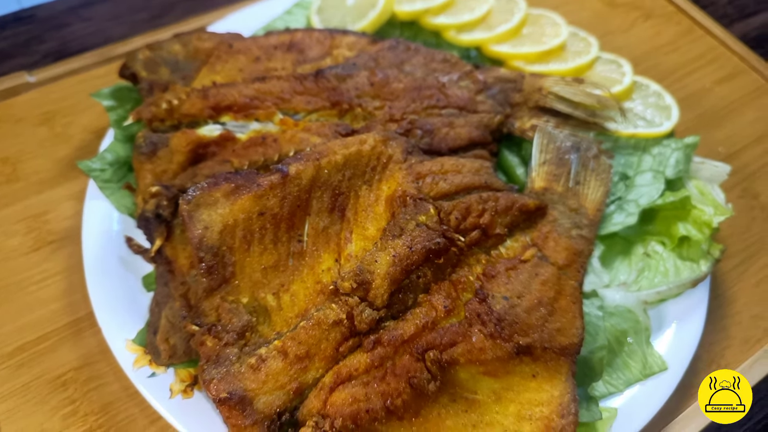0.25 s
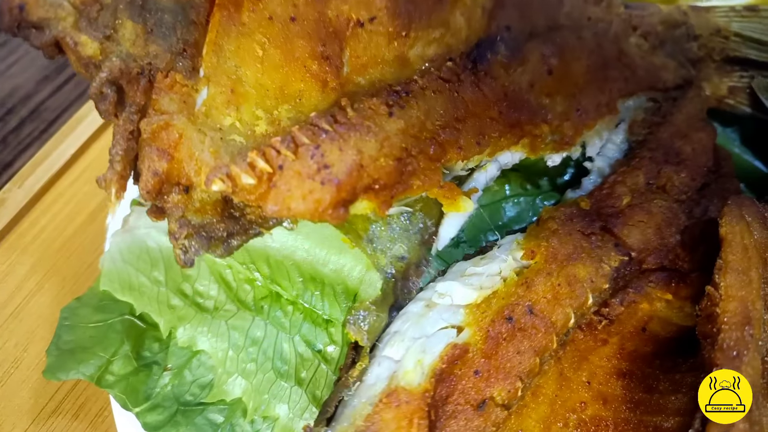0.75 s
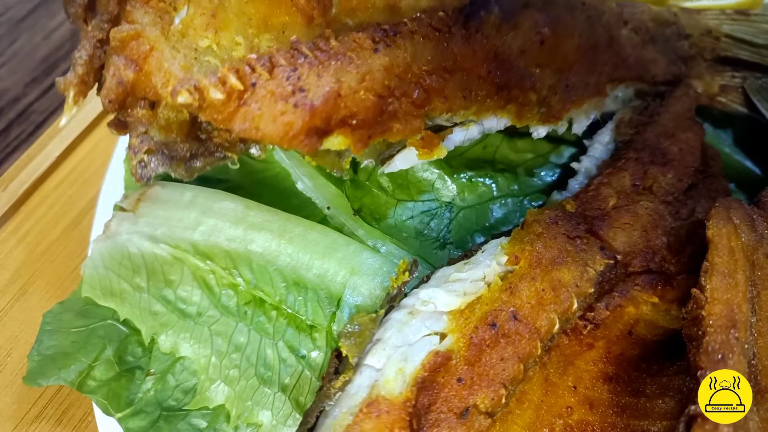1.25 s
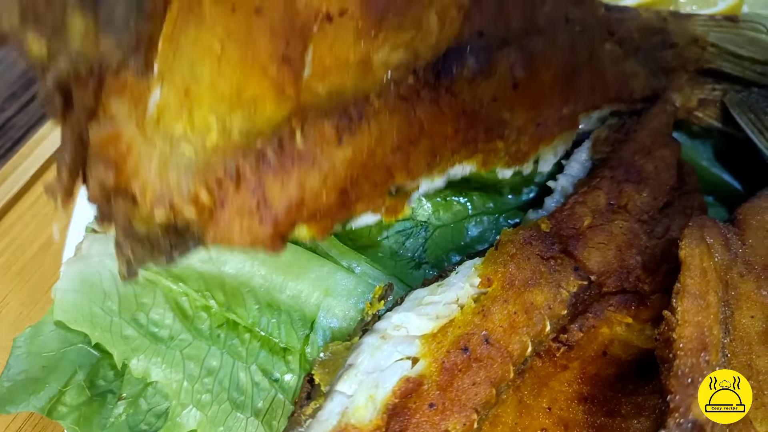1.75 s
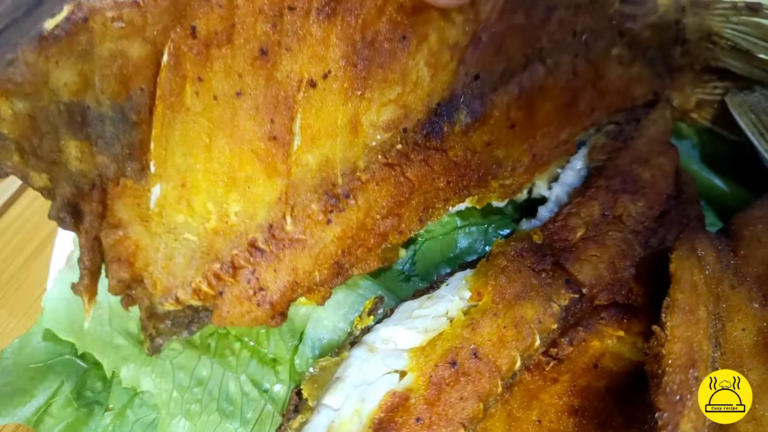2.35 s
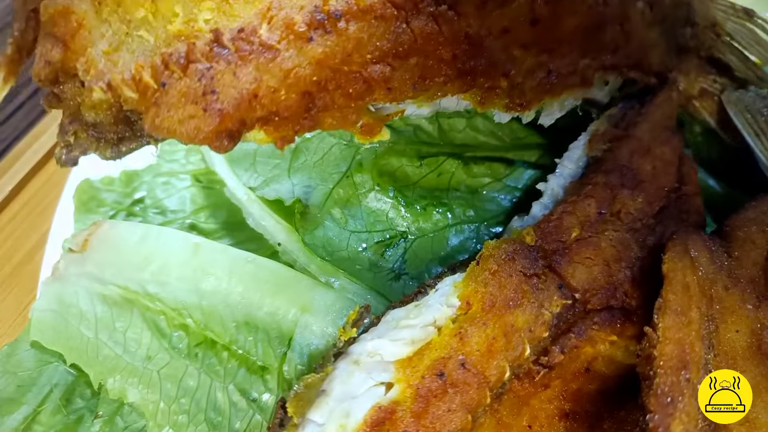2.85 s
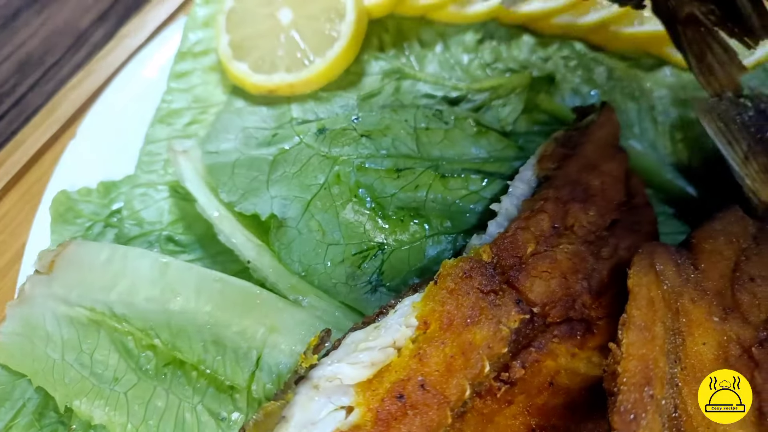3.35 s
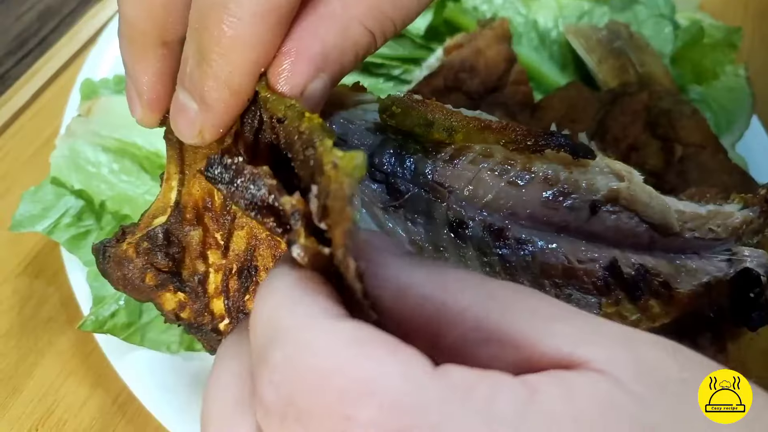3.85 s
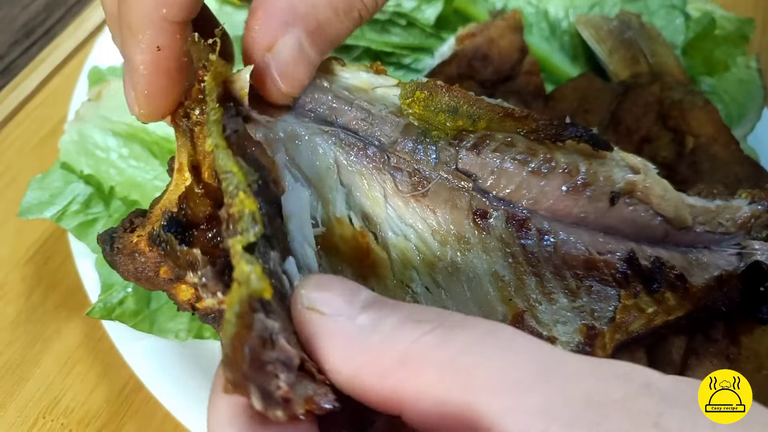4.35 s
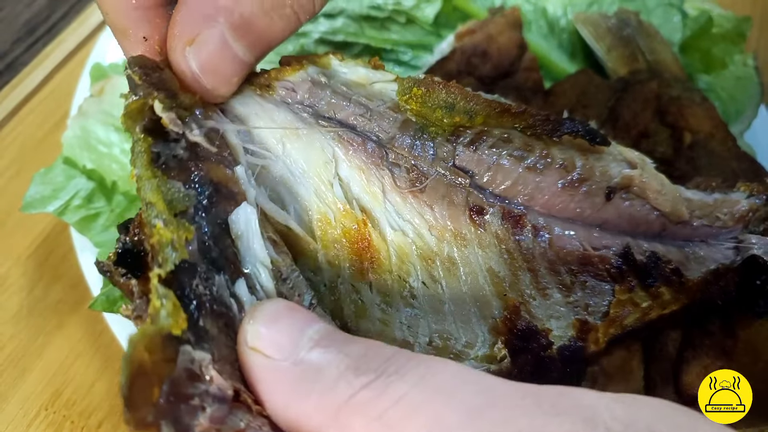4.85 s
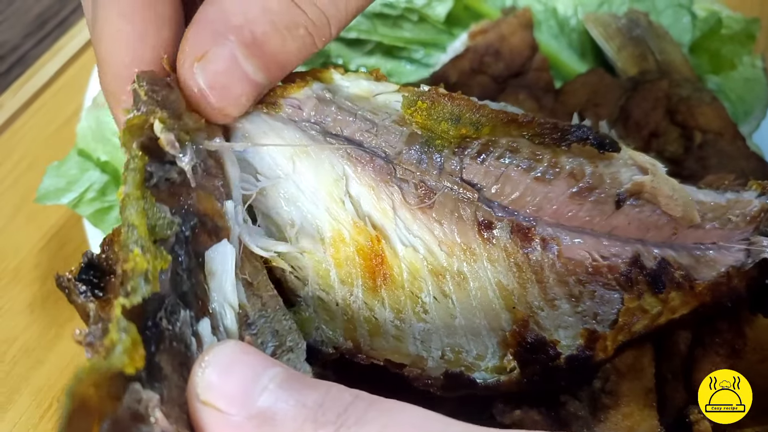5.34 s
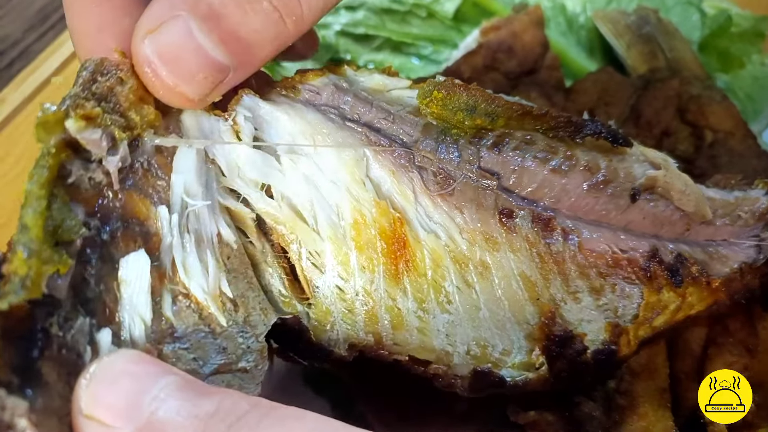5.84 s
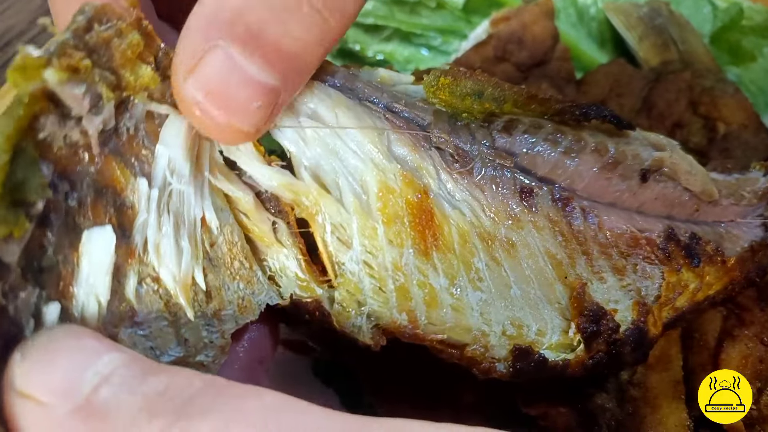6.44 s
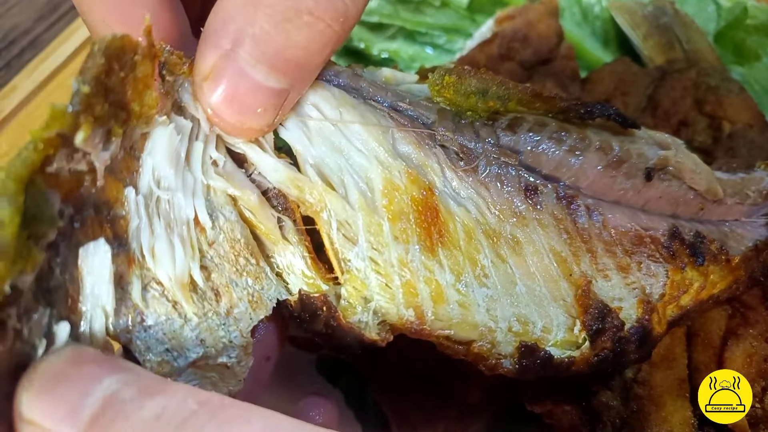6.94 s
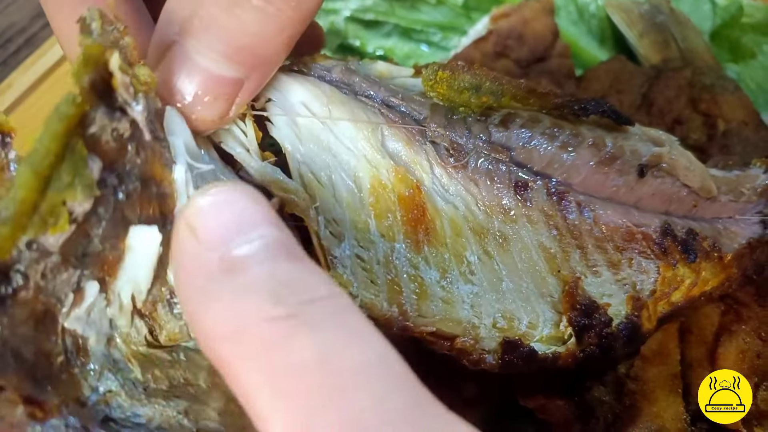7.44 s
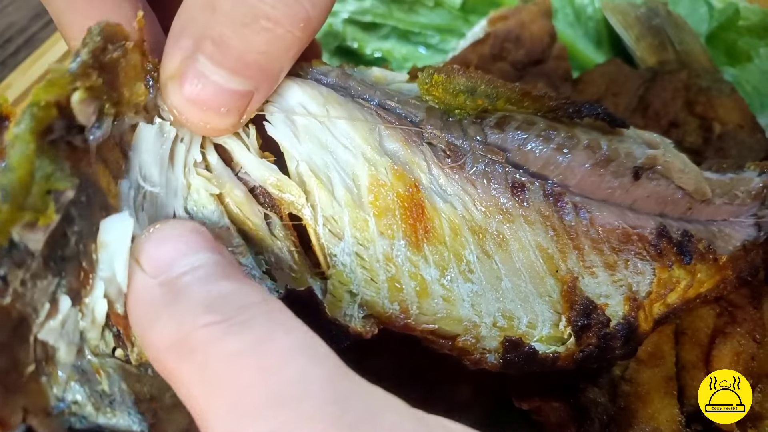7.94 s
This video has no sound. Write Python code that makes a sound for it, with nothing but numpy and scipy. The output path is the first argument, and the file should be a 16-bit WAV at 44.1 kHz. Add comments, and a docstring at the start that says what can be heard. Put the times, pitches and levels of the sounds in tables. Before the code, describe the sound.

A quiet kitchen hums with low fan rumble and a briefly stronger motor drone. Then hands lift a crisp fried fish: sharp dry snaps, ticks and fizzing crackle, soft dragging over lettuce and small dull plate knocks. After a burst near the middle, the fish is opened and its flesh tears with moist, fibrous crackles. Very close stereo microphones, small dry room.

```python
"""Pulling apart a crisp fried fish

Hands pull a fried fish apart on a bed of lettuce. Crust fractures are noise cracks through short random
resonances; streams of smaller grains make the crackle, the dragging skin and the tearing flesh.
A plate rings in damped modes, and filtered noise makes soft brushes of skin. Behind it lie a beating hum
of sines, fan noise, a wavering motor drone, an electrical whine and a gliding whistle."""
import sys
import numpy as np
from scipy import signal
from scipy.fft import rfft, irfft
from scipy.io import wavfile
from scipy.ndimage import uniform_filter1d

SR = 44100
rng = np.random.default_rng(int(sys.argv[2]) if len(sys.argv) > 2 else 0)


def wav_record(signal):
    """Record a signal, one row per channel, as 16-bit PCM in the file named by sys.argv[1]."""
    frames = np.transpose(np.atleast_2d(signal))
    bounded = np.clip(frames, -1, 1)
    # unit amplitude maps onto the largest positive 16-bit level
    quanta = np.round(bounded * 32767).astype(np.int16)
    wavfile.write(sys.argv[1], SR, quanta)


N = 361179
TIME = np.arange(N) / SR
SPECTRUM_HZ = np.fft.rfftfreq(N, 1 / SR)
RING_HZ = np.fft.rfftfreq(1024, 1 / SR)
OPENED_S = 3.7  # the fish lies open from here


def gain_of(db):
    """Decibel law: level in dB to amplitude."""
    return 10 ** (np.asarray(db) / 20)


def evened(x):
    """Normalisation: scales to rms 1."""
    return x / np.sqrt(np.mean(x ** 2) + 1e-20)


def follow(track):
    """Linear interpolation of a (time, value) table over the scene."""
    return np.interp(TIME, *np.transpose(track))


def read(points, hz, channels=1):
    """Spectral envelope: interpolates one table column on a log-frequency axis."""
    table = np.transpose(points)
    return np.interp(np.log(hz + 1), np.log(table[0] + 1), table[channels])


def add(mix, s, sound):
    """Superposition: mixes a stereo sound in at time s."""
    part = mix[:, max(round(s * SR), 0):][:, :sound.shape[1]]
    part += sound[:, :part.shape[1]]


def wander(hz):
    """Low-passed random fluctuation of rms 1, with rates up to about hz."""
    return evened(irfft(rfft(rng.standard_normal(N)) * np.exp(-(SPECTRUM_HZ / hz) ** 2), N))


def causal(db):
    """Minimum phase: the shortest ring with this spectrum, by folding its cepstrum."""
    cepstrum = irfft(np.log(gain_of(db)))
    half = cepstrum.shape[-1] // 2
    fold = np.r_[1, np.full(half - 1, 2), 1, np.zeros(half - 1)]
    return irfft(np.exp(rfft(cepstrum * fold)))


def panned(pan_db):
    """Constant-power panning: left and right gains, pan_db apart."""
    gains = gain_of(np.array([[1], [-1]]) * pan_db / 2)
    return gains / np.sqrt((gains ** 2).mean(0))


# left-right likeness of the air: (f/Hz, coherence)
AIR_COHERENCE = [(30, 0), (100, 0.66), (250, 0.95), (500, 0.03), (1000, 0.0015), (3000, 0), (16000, 0)]


def air(spectrum):
    """Partial coherence: coloured stereo noise of rms 1, its sides most alike near 250 Hz."""
    a, b = rfft(rng.standard_normal((2, N)))
    same = np.clip(read(AIR_COHERENCE, SPECTRUM_HZ), -1, 1)
    right = same * a + np.sqrt(1 - same ** 2) * b
    return evened(irfft(np.array([a, right]) * gain_of(read(spectrum, SPECTRUM_HZ)), N))


# colour of the fan rumble: (f/Hz, level/dB)
FAN_SPECTRUM = [(20, -37), (50, -33), (80, -23), (120, -15.5), (160, -7.5), (205, -4.5), (245, -3.5),
                (285, -3), (340, -8.5), (430, -9.5), (480, -15), (570, -14), (640, -19.5), (740, -27.5),
                (1200, -45)]
# course of the fan before its overall gain: (t/s, level/dB)
FAN_TRACK = [(0, -51), (.34, -51), (.36, -46.5), (1.3, -47.5), (1.8, -49.5), (3.3, -49.5), (3.9, -52),
             (6.3, -52.5), (8.19, -52.5)]
# colour of the faint hiss: (f/Hz, level/dB)
HISS_SPECTRUM = [(100, 0), (800, 0), (1400, -3), (2100, -2.5), (3400, -3), (4400, -7), (5200, -3),
                 (6700, -1), (8400, -3), (8750, -14), (12000, -13.5), (16000, -15)]
# colour of the noise in the drone: (f/Hz, level/dB)
DRONE_SPECTRUM = [(150, -47), (300, -22), (345, -7), (392, -7), (415, -7), (470, -22), (560, -20),
                  (700, -33), (890, -36), (1200, -45), (2800, -44), (4200, -51.5), (6500, -37),
                  (12000, -57)]
# tones of the droning motor: (f/Hz, level/dB relative to the drone)
DRONE_PARTIALS = [(361, -9.5), (393, -8), (538.5, -21.5), (748, -35), (840, -38), (883, -32.5)]
# the drone is strong for a moment, then sinks under the fan: (t/s, level/dB)
DRONE_TRACK = [(0, -45), (.34, -43.5), (.355, -57), (3.7, -61), (3.85, -72), (8.19, -76)]


def kitchen(fan_db=-3.5):
    """Broadband and tonal noise: fan rumble, faint hiss and a motor droning on wavering tones."""
    hiss_db, drone_noise_db, waver_rad = -66.4, -4.5, 0.55
    fan = air(FAN_SPECTRUM) * gain_of(follow(FAN_TRACK) + fan_db)
    tones = sum(gain_of(db) * np.cos(2 * np.pi * hz * TIME + waver_rad * wander(15))
                for hz, db in DRONE_PARTIALS)
    drone = gain_of(drone_noise_db) * air(DRONE_SPECTRUM) + np.sqrt(2) * tones
    return fan + gain_of(hiss_db) * air(HISS_SPECTRUM) + drone * gain_of(follow(DRONE_TRACK))


# motor tones of the kitchen: (f/Hz, level/dB before 3.7 s, level/dB after)
MOTOR_TONES = [(139, -76, -75), (150.4, -76, -73), (175.5, -79, -80), (198.2, -64.5, -69),
               (217.6, -72, -85), (228, -58.5, -79), (240, -66, -60.5), (247.2, -62, -63),
               (255.3, -73, -64), (276, -68.5, -74), (302, -68, -83), (439.5, -64, -74), (495, -87, -80),
               (540.6, -69.5, -74.5), (600, -71, -73)]


def hum(mains_db=-59.0, motor_db=-70.5, waver_rad=0.49):
    """Beating: mains hum against a motor slipping a little behind it; other motor tones waver."""
    mains_hz, slip_hz, in_step_s = 100.0, 1.443, 0.85
    t = TIME - in_step_s
    mains = gain_of(mains_db) * np.cos(2 * np.pi * mains_hz * t)
    motor = gain_of(motor_db) * np.cos(2 * np.pi * (mains_hz - slip_hz) * t)
    later = np.clip((TIME - OPENED_S) / 0.23, 0, 1)
    drifts = [waver_rad * wander(2.6) for _ in range(3)]  # tones share three phase drifts
    tones = np.zeros(N)
    for k, (hz, lifted_db, open_db) in enumerate(MOTOR_TONES):
        level_db = lifted_db + (open_db - lifted_db) * later
        phase = 2 * np.pi * (hz * TIME + rng.random()) + drifts[k % len(drifts)]
        tones += gain_of(level_db) * np.cos(phase)
    edge_fade = signal.windows.tukey(N, 0.002)
    return np.sqrt(2) * (mains + motor + tones) * gain_of([[0.4], [-0.4]]) * edge_fade


# a faint whine that fades early on: (t/s, rms level/dB)
WHINE_TRACK = [(0, -81), (.5, -79.5), (1.9, -86), (2.6, -100)]


def whine(whine_hz=5109):
    """Phase-modulated sine: a thin electrical tone."""
    tone = np.sin(2 * np.pi * whine_hz * TIME + 0.5 * wander(28))
    return np.sqrt(2) * gain_of(follow(WHINE_TRACK)) * tone


# each pull or shove builds up and lets go:
# (peak t/s, build-up t/s, release t/s, crust crackle level/dB, flesh rub level/dB)
HAND_PULLS = [(1.54, 0.018, 0.035, -57, -55.5), (1.84, 0.053, 0.027, -48, -53),
              (1.89, 0.049, 0.035, -47, -46), (2.11, 0.21, .04, -66, -64), (2.46, 0.048, 0.013, -58, -58.5),
              (2.69, 0.1, 0.061, -59, -60.5), (3.06, 0.097, 0.031, -48, -52.5),
              (3.165, 0.013, 0.02, -39.5, -48), (3.305, 0.038, 0.028, -44, -46.5),
              (3.355, 0.058, 0.02, -38.5, -43.5), (3.41, 0.033, 0.089, -53, -50),
              (3.5, 0.063, 0.011, -52, -64), (3.89, 0.035, 0.05, -43.5, -49),
              (4.025, 0.024, 0.048, -46.5, -47), (4.255, 0.017, 0.027, -51, -51.5),
              (4.38, 0.013, 0.018, -47.5, -57), (4.49, 0.034, 0.027, -52.5, -54),
              (4.58, 0.015, 0.017, -55, -55), (4.8, 0.031, 0.062, -46.5, -60),
              (4.925, 0.032, 0.018, -44, -52.5), (5.015, 0.061, 0.02, -54, -51.5),
              (5.068, 0.027, 0.051, -50.5, -52), (5.153, 0.039, 0.047, -44.5, -47),
              (5.44, 0.16, 0.16, -55, -76), (5.62, 0.12, 0.06, -49, -56.5), (5.966, .05, 0.046, -41, -44.5),
              (6.7, 0.028, 0.061, -57, -77), (7.06, 0.024, 0.078, -55, -68), (7.3, 0.07, 0.034, -51, -66),
              (7.362, 0.019, 0.029, -48, -51.5), (7.725, 0.036, 0.038, -42, -60.5),
              (7.783, 0.027, 0.016, -44, -64)]
# between pulls the hands keep a light hold: (t/s, crust crackle level/dB, flesh rub level/dB)
LIGHT_HOLD = [(0, -68, -81), (.65, -77.5, -71), (.85, -67, -68.5), (1.3, -69, -70.5), (1.7, -77, -67.5),
              (2.3, -78, -65), (2.95, -62, -68.5), (3.7, -77, -73), (4.15, -58, -57), (4.7, -68, -62.5),
              (5.3, -83, -66), (5.798, -61, -67.5), (6.15, -73, -69), (6.45, -63.5, -65.5), (6.6, -70, -68),
              (6.88, -60, -68), (7.17, -64, -73.5), (7.55, -69.5, -68), (8.19, -55, -76)]


def effort():
    """Power addition: pulls swell out of the light hold; returns crackle and rub levels in dB."""
    pull_shape = 1.13  # 1 = pointed peak, 2 = rounded
    s, *hold = np.transpose(LIGHT_HOLD)
    power = gain_of([np.interp(TIME, s, db) for db in hold]) ** 2
    for peak_s, build_s, release_s, crackle_db, rub_db in HAND_PULLS:
        t = np.arange(-4 * build_s, 4 * release_s, 1 / SR)
        swell = np.exp(-np.maximum(-t / build_s, t / release_s) ** pull_shape)
        add(power, peak_s + t[0], (gain_of([[crackle_db], [rub_db]]) * swell) ** 2)
    return 10 * np.log10(power)


# a typical fracture at the left and right port: (f/Hz, left level/dB, right level/dB)
CRUST_SPECTRUM = [(60, -75, -41), (251, -49, -25), (654, -29, -23), (1100, -16, -13), (1530, -23.5, -14),
                  (2880, -11.5, -10), (3070, -9.5, -3.5), (4500, -8, -14), (5720, -2.5, -10),
                  (6800, 3, -0.5), (7350, 0, 1), (8510, -12.5, 1), (8510, -20, -4.5), (14800, -19.5, -18.5)]


def crust_colour():
    """Spectral envelope of a fracture at both ports, in dB."""
    return np.array([read(CRUST_SPECTRUM, RING_HZ, channels=side) for side in (1, 2)])


def flake(colour_db, ripple_db, run_s, click_db, tail_db=-21):
    """Source and filter: a noise crack rings a flake's chance resonances, to energy 1 a side."""
    ripples = evened(uniform_filter1d(rng.standard_normal((3, len(RING_HZ))), size=20, axis=1))
    # one ripple pattern is shared by the ports, one is each port's own
    ring = causal(colour_db + ripple_db * (ripples[0] + 0.88 * ripples[1:]))
    t = np.arange(ring.shape[1]) / SR
    run_out = np.exp(-t / run_s) + gain_of(tail_db) * np.exp(-t / 0.005)
    crack = rng.standard_normal(ring.shape) * (1 - np.exp(-t / 0.00031)) * run_out
    crack /= np.linalg.norm(crack, axis=1, keepdims=True)
    # the sharp release reaches the two ports a few samples apart
    lag = int(np.clip(rng.normal(5, 7), -9, 24))
    crack[0, 10] += gain_of(click_db)
    crack[1, 10 + lag] += gain_of(click_db)
    sound = signal.fftconvolve(ring, crack, axes=1)[:, :len(t)]
    return sound / np.sqrt((sound ** 2).sum(1, keepdims=True))


def grains(colour_db, per_s, spread_db, ripple_db, tail_db=-11.0, count=30):
    """Random point process: tiny breaks of unequal size from many flakes, scaled to rms 1."""
    out = np.zeros((2, N))
    most_per_s = 3000
    for _ in range(count):
        sound = flake(colour_db, ripple_db, run_s=0.00035, click_db=-4.0, tail_db=tail_db)
        sound = sound * gain_of(rng.normal(0, 5.1) * np.array([[1], [-1]]))  # each flake has its side
        size, chance, when = rng.random((3, int(np.ceil(most_per_s * N / SR / count))))
        keep = chance < per_s / most_per_s
        start = (when[keep] * (N - sound.shape[1])).astype(int)
        at = start[:, None] + np.arange(sound.shape[1])
        # exponentially distributed level, cut off at three spreads
        size = gain_of(spread_db * np.minimum(-np.log(1 - size[keep]), 3))[:, None]
        out += [np.bincount(at.ravel(), (size * side).ravel(), N) for side in sound]
    return evened(out)


# the fish drags over the lettuce before it is raised: (f/Hz, level/dB)
DRAG_SPECTRUM = [(50, -36), (200, -2), (500, -1), (750, 6), (1000, 8), (1250, 1.5), (1500, 1), (1900, 5),
                 (2600, 0), (3400, -2.5), (4300, -3), (5600, -2), (7000, -10), (9500, -11.5), (16000, -33)]
# the raised fish scrapes along the plate: (f/Hz, level/dB)
SLIDE_SPECTRUM = [(50, -46), (200, -4), (500, 5), (750, 1), (950, 10), (1150, 2), (1450, -15), (1850, 14.5),
                  (2500, -5), (3100, -3), (3750, 4), (4400, 0), (5200, -16), (8300, -4), (10600, -2),
                  (11300, -25), (16000, -22)]
# wet fibres part in the hollow of the opened fish: (f/Hz, level/dB)
FLESH_SPECTRUM = [(50, -49), (200, -21.5), (620, 0.5), (850, -0.5), (1200, -2.5), (1500, 2), (1850, -3),
                  (2300, -1.5), (2750, 2), (3350, -2.5), (4600, -13), (8000, -7), (16000, -40)]
# where the crust is breaking: (t/s, left minus right level/dB)
CRUST_PLACE = [(0, -7), (2.2, 4), (2.7, 0), (3.4, -5.5), (3.9, 2.5), (5.1, 0.5), (6, -1.5), (7, 1),
               (8.19, 0.5)]
RAISED_S = 2.85  # dragging gives way to scraping


def tearing(crackle, rub):
    """Stick-slip and fracture: small breaks of crust and duller slips of flesh follow the pull."""
    hard_db, crackle_db = -45, -5.5
    # single ticks stand out under a light pull and merge into a fizz under a hard one
    strain = np.minimum(crackle - hard_db, 6)
    fizz = grains(crust_colour(), per_s=1500, spread_db=4.0, ripple_db=4.5, tail_db=-27.0)
    fizz = fizz * gain_of(crackle + 0.18 * strain)
    # one break sets off its neighbours, so the fizz comes in short bursts
    fizz *= evened(gain_of(1.0 * wander(140)))
    ticks = grains(crust_colour(), per_s=110, spread_db=2.5, ripple_db=4.0, tail_db=-22)
    ticks = ticks * gain_of(crackle - 0.46 * strain + crackle_db)

    drag_db, wet_underside_db, clump_db = 3.0, -4.5, 2.5
    both = np.ones((2, 1))
    slide = grains(read(SLIDE_SPECTRUM, RING_HZ) * both, per_s=1000, spread_db=1.0, ripple_db=2.0)
    flesh = grains(read(FLESH_SPECTRUM, RING_HZ) * both, per_s=450, spread_db=0.5, ripple_db=3.5)
    drag = grains(read(DRAG_SPECTRUM, RING_HZ) * both, per_s=1100, spread_db=1.0, ripple_db=4.5)
    scrape = slide + gain_of(wet_underside_db) * flesh
    soft = np.select([TIME < RAISED_S, TIME < OPENED_S], [drag * gain_of(drag_db), scrape], flesh)
    # the soft sounds spread to both ports and come in stick-slip clumps
    soft = (soft + 0.079 * soft[::-1]) * gain_of([[-2.5], [0.7]])
    soft = soft * evened(gain_of(clump_db * wander(40)))
    return (fizz + ticks) * panned(follow(CRUST_PLACE)) + soft * gain_of(rub)


def fracture(db, hollow, bite, pan):
    """Brittle fracture: a break 3 ms into the sound; thick flakes sound hollow, thin ones splinter."""
    out = np.zeros((2, 2 * len(RING_HZ) + SR // 100))
    hollow_db, break_s, lead_in_db, lead_in_s = hollow - 4.0, 0.0028, -18, 0.0015
    splinter_db = 0.5 * rng.standard_normal()
    tint = read([(450, 0), (1200, hollow_db), (1700, hollow_db), (2800, bite), (4300, bite),
                 (5800, 0.0043), (8600, 0), (11000, splinter_db)], RING_HZ)
    colour = crust_colour() + tint
    size = np.sqrt(0.0025 * SR) * gain_of(db) * panned(pan)  # level counts over 2.5 ms
    # a weak, soft noise leads into the break
    lead_in = flake(colour, ripple_db=3.5, run_s=lead_in_s, click_db=-29)
    add(out, rng.uniform(0, 0.0014), size * gain_of(lead_in_db) * lead_in)
    # a thick flake takes longer to break through
    thickness = max(hollow, 0)
    run_s = 0.00053 * gain_of(0.68 * thickness)
    add(out, break_s, size * flake(colour, ripple_db=2.0, run_s=run_s, click_db=-2.0 - 0.5 * thickness))
    return out


def chips(crackle_db):
    """Jittered point process: small fractures all the while, louder when the crust is worked harder."""
    grip_s, per_s = 0.4, 8
    level_db, level_spread_db, follow_ratio = -50.5, -0.5, 0.29  # ratio: chip dB per dB of crackle
    hollow_mid_db, hollow_spread_db, bite_spread_db, pan_spread_db = 7, 15.5, -2.5, 17
    out, count = np.zeros((2, N)), round(per_s * (N / SR - grip_s))
    usual_db = np.median(crackle_db)
    for k, (when, size, hollow, bite, side) in enumerate(rng.uniform(-0.92, 1, (count, 5))):
        s = grip_s + (k + 1 + when) / per_s
        harder_db = np.interp(s, TIME, crackle_db) - usual_db
        db = level_db + follow_ratio * harder_db + level_spread_db * size
        pan = np.interp(s, *np.transpose(CRUST_PLACE)) + pan_spread_db * side
        add(out, s, fracture(db, hollow_mid_db + hollow_spread_db * hollow, bite_spread_db * bite, pan))
    return out


# single fractures of the crust, from loud snaps to faint ticks, before the colourings that follow:
# (t/s, level/dB, hollow part near 1 kHz level/dB, bite near 3.5 kHz level/dB, left minus right level/dB)
CRUST_SNAPS = [(0.418, -47.5, 15, 3.5, 7), (0.5773, -51, -2, -2, -4), (0.7326, -46, -0.5, -3, 0),
               (.766, -36.5, 4, -0.5, 0), (0.8344, -33.5, 0, -9, 1), (0.9237, -34, 8, 1, 2),
               (0.98, -47.5, 0, 0, -2), (1.012, -48, -4, -6, 0), (1.098, -44.5, 19, 8, 0),
               (1.1743, -37, 4, -3, 1), (1.181, -35.5, 0, -11, 2), (1.1944, -39, -5, -7, -10),
               (1.22, -44, 17, -3, 1), (1.231, -48, 9, 2, -6), (1.2625, -33, -7, -2, -7),
               (1.3385, -27.5, -1, -2.5, -8), (1.3515, -37, -7, -4, -1), (1.4199, -28, 10, 3.5, -9),
               (1.4314, -37.5, 12, 3, -2), (1.491, -39.5, 3, 1, 1), (1.496, -43.5, -3, -4, -2),
               (1.525, -36.5, -4, -3, -8), (1.529, -37, 21, 7, 0), (1.579, -42, -2, -3, -8),
               (1.6046, -45, 16, 6, 1), (1.6285, -45, 6, 4, -3), (1.837, -44, 8, 11, -2),
               (1.8595, -31.5, -3, -12, -6), (1.901, -35.5, 15, 1, 17), (1.953, -43, 30, 8, 1),
               (2.021, -47.5, 15, 6, 8), (2.0413, -42.5, 2, 1, -5), (2.1234, -45, 25, -7, -1),
               (2.361, -44, 18, 7, 4), (2.4186, -50, 6, 4, -7), (2.428, -45.5, 10, -4, -2),
               (2.469, -38, 14, 8.5, 4), (2.5139, -46.5, -9, -12, -14), (2.541, -45.5, 6, -17, -4),
               (2.5607, -49, 16, -11, -12), (2.6286, -49.5, 14, 4, -3), (2.6678, -44, -1, 4, -6),
               (2.7485, -45.5, 27, 6, -1), (2.88, -46, -10, -17, -11), (2.9116, -43, -15, 2, 7),
               (2.9424, -44, 5, -2, -9), (2.948, -40.5, -4, -12, 1), (2.9948, -42, 1, 4, -1),
               (3.0356, -40, -5, -8, -9), (3.0496, -36.5, -11, -17, -9), (3.109, -35.5, 8, 1, -1),
               (3.1136, -33, 1, 0, -11), (3.127, -40, 5, 0, 1), (3.151, -29.5, 5, 3, -2),
               (3.1534, -27.5, 7, -4, -3), (3.262, -36, 4, 6, -3), (3.294, -38, 9, -2, -4),
               (3.3105, -39, 4, 2, -5), (3.346, -36, 10, 4, -5), (3.362, -36, 4, 6, -11),
               (3.398, -42, 29, 15, -11), (3.4989, -42.5, -2, -6, -9), (3.5203, -50, 6, 11, -6),
               (3.7324, -48.5, 0, 8, -1), (3.849, -38, 10, -2, 9), (3.8531, -30.5, 15, 4, 2),
               (3.878, -28, 6, -3, 13), (3.881, -30.5, 22, 6, -8), (3.8963, -26, -18, -19, 3),
               (3.9215, -36, 3, -3, 0), (3.9319, -42, 3, -5, 2), (3.945, -36.5, 22, 6, -1),
               (3.9588, -42, 17, 16, 6), (3.972, -32.5, 7, 2, 2), (3.977, -27, -6, -15, 0),
               (4.0034, -42, 1, 0, 5), (4.0112, -34.5, -8, -9, 2), (4.0235, -27, -13, -20, 1.5),
               (4.112, -45, -3, 1, 13), (4.1512, -37, 12, 2, 6), (4.1898, -37, 16, 14, -2),
               (4.2274, -50, 20, 0, 2), (4.248, -39, 25.5, 10, -2), (4.3607, -45, 12, 11, -2),
               (4.3674, -46, 7, -3, 7), (4.412, -47, -2, 9, 6), (4.426, -47, -3, 7, -14),
               (4.4407, -50, 11, 8, 1), (4.475, -47, 4, 5, -1), (4.503, -45, 5, 0, -8),
               (4.5252, -43.5, 9, -3, -2), (4.5606, -42, -3, 3, 8), (4.586, -47, 5, 20, -6),
               (4.638, -31.5, 8, -3, 6), (4.701, -43, 26, 3, 1), (4.713, -48, 0, -6, -7),
               (4.782, -29, 0, 2.5, 2), (4.8133, -36.5, 9, 3, 6), (4.8671, -52, 13, 5, -4),
               (4.887, -47, -4, -3, 4), (4.916, -42, -5, -5, 10), (4.9973, -43, 7, -4, 8),
               (5.0117, -45, 5, -4, 4), (5.021, -47.5, 24, 3, -2), (5.044, -42, 23, 2, -6),
               (5.064, -44, 31, 1, -9), (5.1223, -42, -7, -7, 2), (5.135, -41, 33, 6, -6),
               (5.15, -38, 1, -3, -8), (5.2837, -45, -6, -13, 3), (5.3093, -46, 5, 0, -2),
               (5.3495, -44.5, 10, 3, 0), (5.361, -39, -4, -11, -8), (5.3915, -31.5, 7.5, -8, -4.5),
               (5.4086, -46, -8, -15, -11), (5.4445, -39.5, 8, 4, 0), (5.45, -38.5, -9, 1, -8),
               (5.467, -40, 7, -16, -5), (5.4824, -45, 3, -10, -2), (5.4989, -28, -9, -2, -5),
               (5.5114, -44, -7, -9, 1), (5.5517, -37, -2, -4, -2), (5.587, -26.5, -9, -3.5, -3),
               (5.61, -32, -12, -13, -9), (5.6196, -38, -7, -1, 2), (5.637, -35, -12, 2, -1),
               (5.6542, -37, -10, -11, -10), (5.6661, -48, 0, -6, 3), (5.6936, -48, -3, -9, -4),
               (5.765, -46.5, 5, -7, 1), (5.7762, -42.5, 1, -5, -5), (5.784, -49, -9, -8, -1),
               (5.8113, -44.5, 1, -6, -5), (5.857, -37.5, 9, 0.5, -2), (5.907, -44, 7, 6, -3),
               (5.9218, -30, -11, -16, 2), (5.9939, -39, -10, -3, 9), (6.0048, -33.5, -11, -14, 10),
               (6.0254, -33.5, -11, 0, 2), (6.034, -40, 6, -5, 6), (6.0484, -44.5, 10, 3, -6),
               (6.227, -31.5, 3.5, 0, 1), (6.2532, -38.5, -1, -2, -2), (6.34, -44, -11, -5, 5),
               (6.6585, -46, 1, 5, 3), (6.678, -36.5, -24, 4, 5), (6.692, -43, -2, -10, -7),
               (6.729, -46, 0, 3, 7), (6.7616, -47, 28, 8, -4), (6.794, -42.5, 13, 4, 3),
               (6.8337, -43, -18, -7, -1), (6.8937, -47, -1, 2, 16), (6.9, -41.5, 8, 10, -4),
               (6.9808, -36.5, -11, 5, 0), (7.0197, -43, -1, 3, -5), (7.0263, -28, 1.5, 4.5, 2),
               (7.0442, -47, -2, -2, -1), (7.062, -46, 3, 1, 2), (7.0653, -50, -4, -3, -1),
               (7.0813, -35.5, 7, 3, 8), (7.0935, -34, -7, 1, 5), (7.117, -41, -6, -3, -4),
               (7.1978, -41, 1, 8, 2), (7.2468, -43, -8, -4, 0), (7.39, -43, 3, 22, 3),
               (7.6754, -39, 8, 1, 8), (7.69, -39, 7, 14, 1), (7.7028, -39.5, -5, 6, 5),
               (7.72, -34.5, -13, -3, 8), (7.7247, -38, -4, -4, 4), (7.7452, -41, -13, -5, 9),
               (7.7604, -37, -8, -8, 11), (7.7789, -31.5, -8, 2, -1), (7.785, -29.5, -6, -6, 0),
               (7.7933, -39, -3, -2, 9), (7.862, -46, -6, -6, 7), (7.8678, -42, -3, 0, 3),
               (7.8734, -35.5, -19, -10, 12), (7.877, -37.5, -10, -10, 7), (7.948, -46, -6, 0, -1),
               (7.954, -31, -6, -11, 5), (7.959, -38.5, -2, 0, -2), (7.9749, -40, -10, 1, 0),
               (8.0032, -38, 3, 0, 0), (8.013, -45, 1, -5, 7), (8.0637, -46, -2, -4, -3),
               (8.0968, -35.5, -20, -5, 4), (8.1142, -50, -8, -14, 9), (8.1286, -39, -12, -4, -2),
               (8.144, -40.5, -14, -4, -1), (8.1644, -45, 1, 11, -2), (8.1726, -41.5, -4, -6, -4)]


def snaps():
    """Fracture cascade: single breaks, some with a weaker one just before or on their heels."""
    out = np.zeros((2, N))
    lead_s, neighbour_chance = 0.003, 0.35
    before_s, before_db, after_s, after_db = 0.0073, -23, 0.013, -15
    chances = rng.random((len(CRUST_SNAPS), 4))
    for (s, db, hollow, bite, pan), (before, after, lead, wait) in zip(CRUST_SNAPS, chances):
        start_s = s - lead_s
        add(out, start_s, fracture(db, hollow, bite, pan))
        if before < neighbour_chance:
            add(out, start_s - before_s * (0.5 + lead), fracture(db + before_db, hollow, bite, pan))
        if after < neighbour_chance:
            add(out, start_s + after_s * (0.5 + wait), fracture(db + after_db, hollow, bite, pan))
    return out


# the fish bumps the plate: (t/s, relative level/dB)
PLATE_BUMPS = [(1.421, -41), (1.531, -61), (1.549, -44), (1.859, -38), (2.126, -44), (2.471, -34.5),
               (3.34, -26.5), (3.346, -51), (3.397, -36.5)]
# modes of the loaded plate, each lowered a little at random: (f/Hz, level/dB, t60/s)
PLATE_MODES = [(770, -2.5, 0.015), (926, 2, 0.02), (1027, -3, 0.024), (1120, -13, 0.024),
               (1740, -21, 0.027), (2140, -5, 0.016)]


def bumps(level_db=-1.0):
    """Modal synthesis: soft blows ring the plate, damped by lettuce and fish."""
    out, t = np.zeros((2, N)), np.arange(SR // 8) / SR
    soft_onset = 1 - np.exp(-t / 0.0009)
    for s, bump_db in PLATE_BUMPS:
        ring = np.zeros(len(t))
        for hz, db, t60 in PLATE_MODES:
            mode_hz = hz * rng.uniform(0.95, 0.99)
            ring += gain_of(db - 60 * t / t60) * np.sin(2 * np.pi * mode_hz * t)
        add(out, s, gain_of(bump_db + level_db) * ring * soft_onset * gain_of([[-2], [0]]))
    return out


# a thin whistle comes three times, one pitch track each: (t/s, f/Hz)
WHISTLE_TRACKS = [
    [(1.5, 12050), (1.58, 11300), (1.66, 11800), (1.72, 11350)],
    [(5.2, 12500), (5.25, 12300), (5.32, 11800), (5.38, 11750)],
    [(7.51, 11700), (7.57, 12000), (7.61, 12500), (7.69, 11850)],
]


def whistles(level_db=-76.0, waver_hz=13.0):
    """Frequency modulation: a faint, thin, gliding whistle from an integrated pitch track."""
    out = np.zeros((2, N))
    for rows in WHISTLE_TRACKS:
        s, hz = np.transpose(rows)
        t = np.arange(s[0], s[-1], 1 / SR)
        pitch = np.interp(t, s, hz) + waver_hz * wander(200)[:len(t)]
        tone = np.sin(2 * np.pi * np.cumsum(pitch) / SR) * signal.windows.tukey(len(t), 0.4)
        add(out, s[0], gain_of(level_db) * np.array([tone, tone]))
    return out


# smooth skin brushes past without breaking: (peak t/s, half length t/s, level/dB)
SKIN_BRUSHES = [(2.128, 0.069, -57), (7.308, 0.14, -63), (7.48, 0.039, -60), (7.609, 0.025, -52.5)]
# the hiss of such a brush: (f/Hz, level/dB)
SKIN_SPECTRUM = [(100, -20), (1500, -10), (2600, -3), (3400, 0.5), (4500, -7), (6000, -4), (7300, 2),
                 (8400, -2), (8900, -12), (16000, -12)]


def brushes():
    """Friction noise: soft, even swells of coloured hiss."""
    swells = sum(gain_of(db) * np.exp(-((TIME - s) / half_s) ** 2) for s, half_s, db in SKIN_BRUSHES)
    return air(SKIN_SPECTRUM) * swells


# gain of the top treble in the breaking sounds: (t/s, level/dB)
TREBLE_TRACK = [(0, -1), (1.4, -2.5), (2, 1.5), (2.7, 8), (3.2, 1.5), (3.5, 2.5), (3.88, 3.5), (4.05, 7.5),
                (4.25, 5), (4.48, 10), (4.85, 4), (5.05, 1.5), (5.7, 1), (6.8, 2.5), (8.19, -1)]


def brighten(x, corner_hz=9300):
    """Time-varying shelf: raises or lowers the top of the treble as time goes on."""
    high_pass = 1 - 1 / (1 + (SPECTRUM_HZ / corner_hz) ** 10)
    treble = irfft(rfft(x) * high_pass, N)
    return x + (gain_of(follow(TREBLE_TRACK)) - 1) * treble


# the gap torn in the flesh colours all that breaks around it: (f/Hz, level/dB)
GAP_SPECTRUM = [(500, 1), (800, 3), (1100, 2.5), (1600, -1), (2250, -0.5), (2800, -1.5), (3400, 1.5),
                (4100, 0), (5400, 2), (6500, 1), (7200, 0), (8400, 0), (16000, 0)]


def gap(x):
    """Cavity resonance: once the flesh tears open, its hollow rings along."""
    torn_s, tear_s = 5.7, 0.15
    hollow = irfft(rfft(x) * gain_of(read(GAP_SPECTRUM, SPECTRUM_HZ)), N)
    return x + np.clip((TIME - torn_s) / tear_s, 0, 1) * (hollow - x)


def room(x, wet_db=-21.0, t60=0.19, near_db=-14.5):
    """Reverberation: quick scatter from plate, board and hands, a short lull, the kitchen's tail."""
    near_t60, first_wall_s = 0.02, 0.009
    t = np.arange(SR // 3) / SR
    taps = rng.standard_normal((2, 2, len(t))) * (rng.random((2, 2, len(t))) < 0.12)
    near = taps[0] * gain_of(-60 * t / near_t60) * (t > 0.001)
    far = taps[1] * gain_of(-60 * t / t60) * (t > first_wall_s)
    echo = (gain_of(near_db) * evened(near) + gain_of(wet_db) * evened(far)) / np.sqrt(len(t))
    return x + signal.fftconvolve(x, echo, axes=1)[:, :N]


# resonances of the microphone ports: (f/Hz, width f/Hz, left level/dB, right level/dB)
PORT_RESONANCES = [(3480, 320, -9, -6.5), (6490, 120, -7.5, -30), (7180, 140, -21, -17),
                   (8395, 110, -12, 0)]


def ports(x):
    """Cavity resonance: the small hollow of each microphone port rings in the treble."""
    out = x.copy()
    for hz, width, left_db, right_db in PORT_RESONANCES:
        b, a = signal.iirpeak(hz, hz / width, SR)
        out += gain_of([[left_db], [right_db]]) * signal.lfilter(b, a, x)
    return out


def scene():
    """Superposition: the fish in its room, over the kitchen's background sounds."""
    crackle, rub = effort()
    breaking = snaps() + chips(crackle) + tearing(crackle, rub)
    fish = room(gap(brighten(breaking)) + bumps() + brushes())
    return gain_of(-2.0) * ports(fish) + hum() + kitchen() + whistles() + whine()


# the level dips briefly: (t/s, half width t/s, depth level/dB)
LEVEL_DIPS = [(0.345, 0.005, -18), (3.822, 0.005, -4)]


def record(dry):
    """Gain and band limiting: two brief dips in level, then a linear-phase low-pass."""
    edge_hz = 16100
    dip_db = sum(db * np.exp(-((TIME - s) / width) ** 2) for s, width, db in LEVEL_DIPS)
    low_pass = signal.firwin(255, edge_hz, window=("kaiser", 9), fs=SR)
    return signal.oaconvolve(dry * gain_of(dip_db), low_pass[None], "same")


dry = scene()
out = record(dry)
wav_record(out)
```